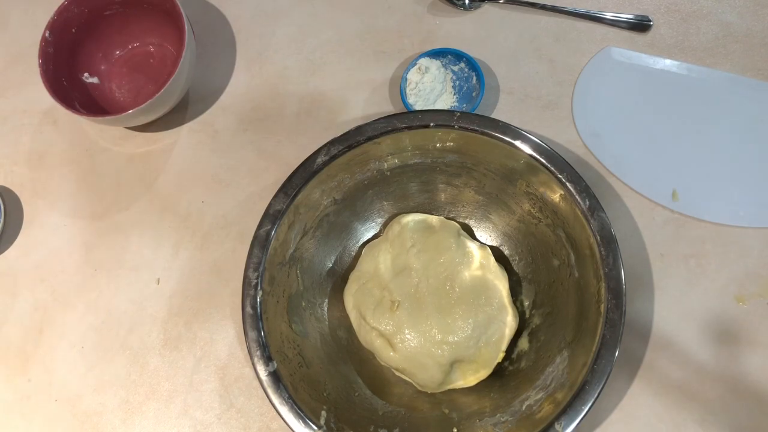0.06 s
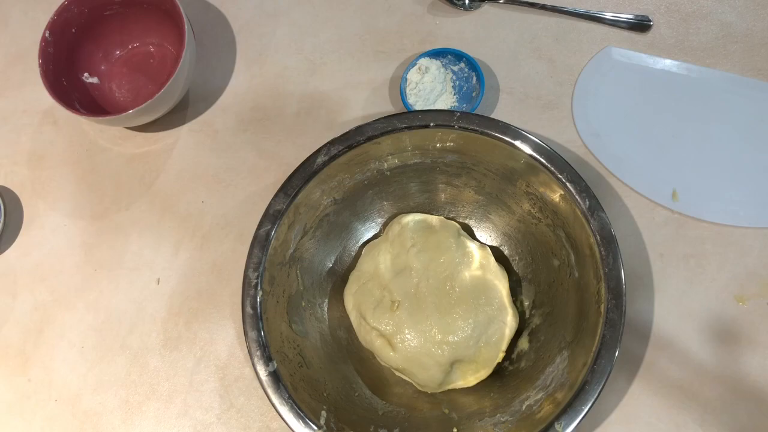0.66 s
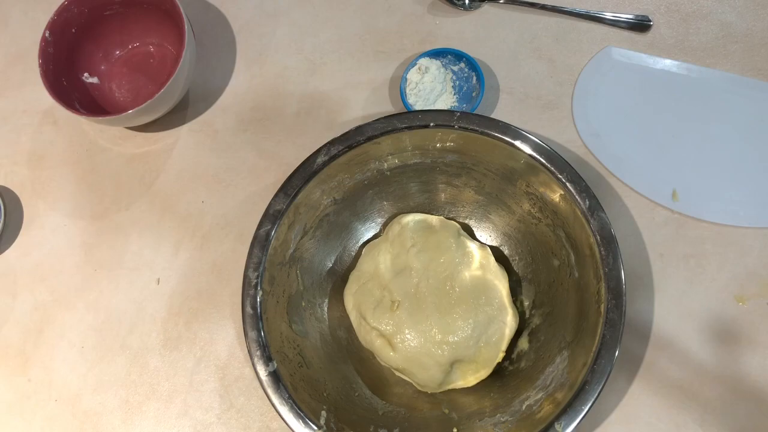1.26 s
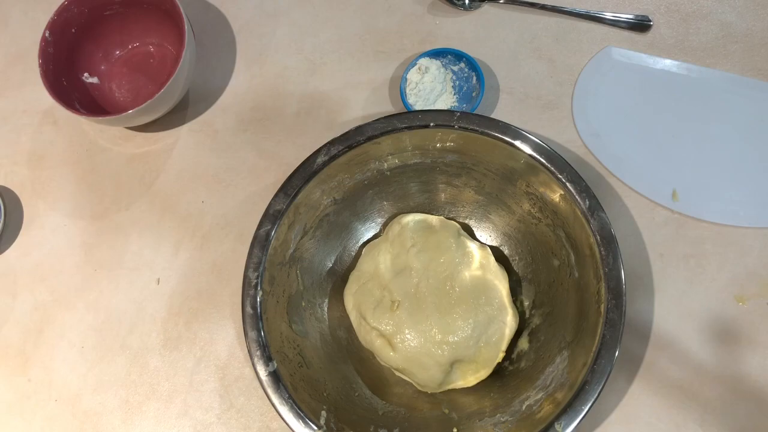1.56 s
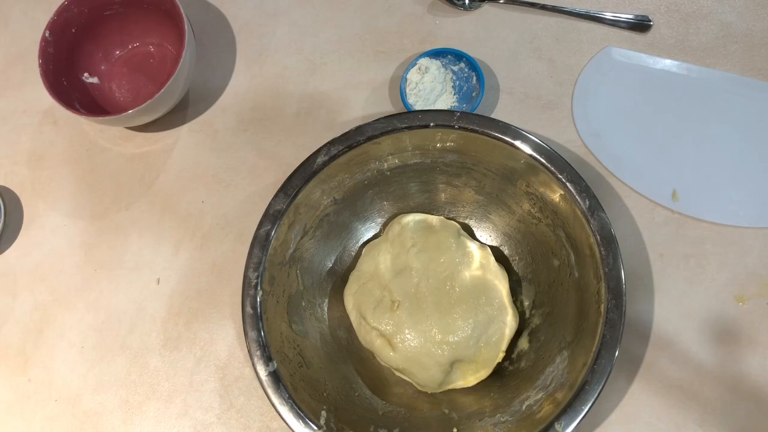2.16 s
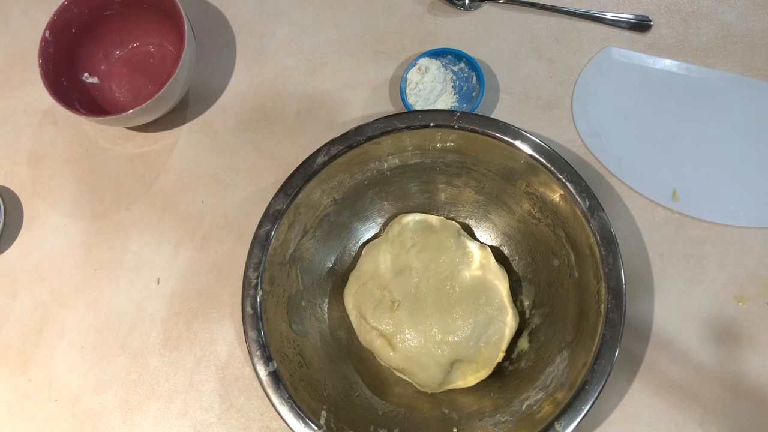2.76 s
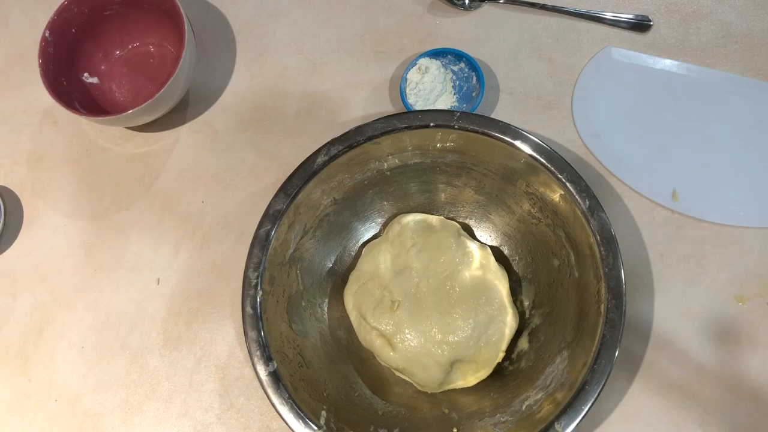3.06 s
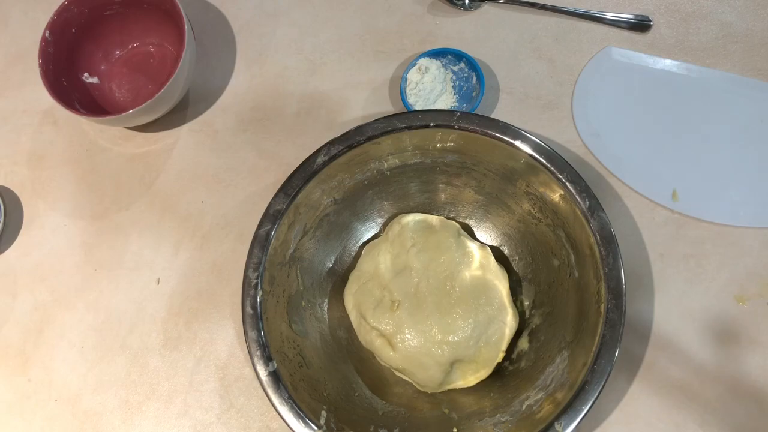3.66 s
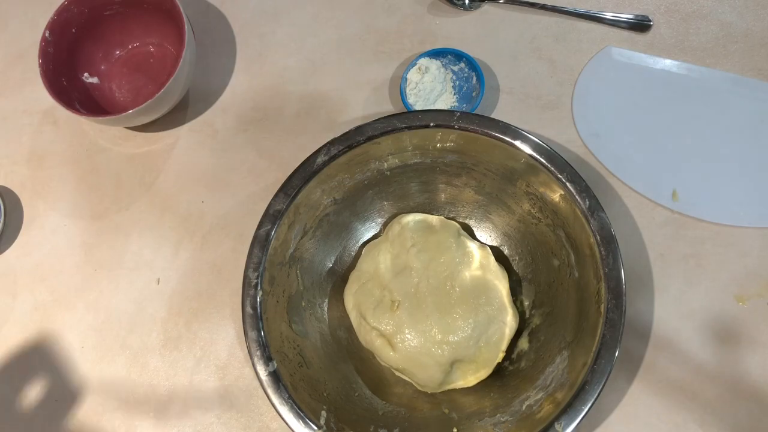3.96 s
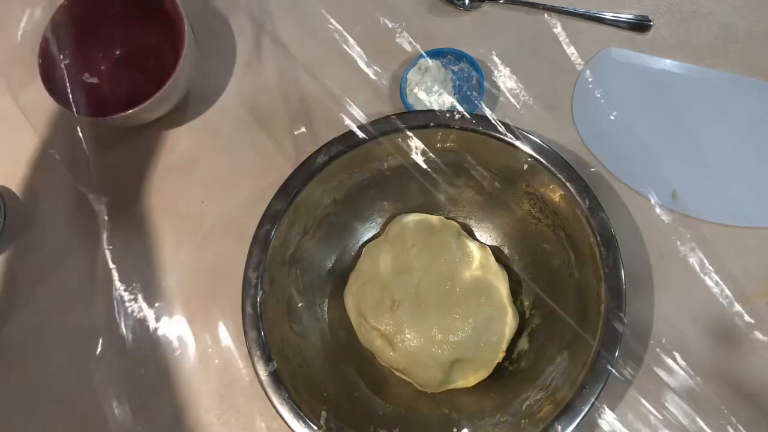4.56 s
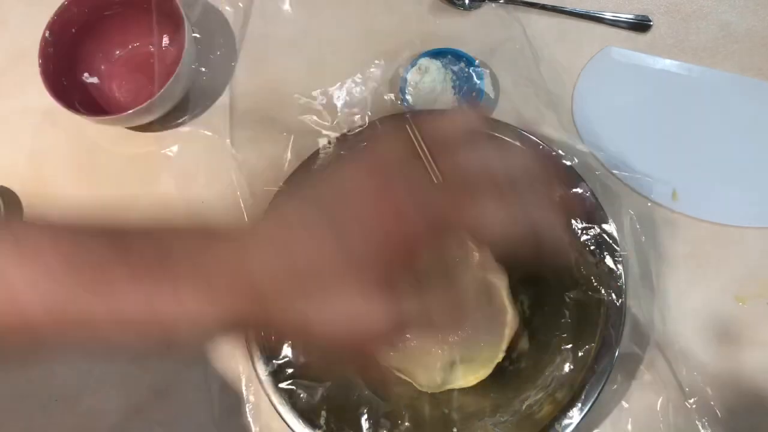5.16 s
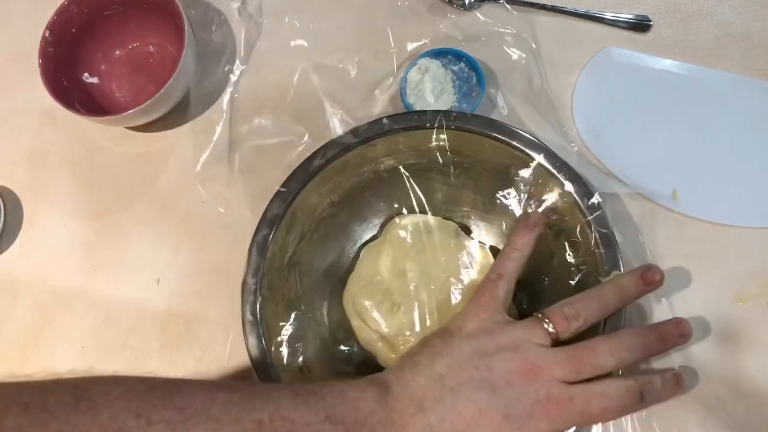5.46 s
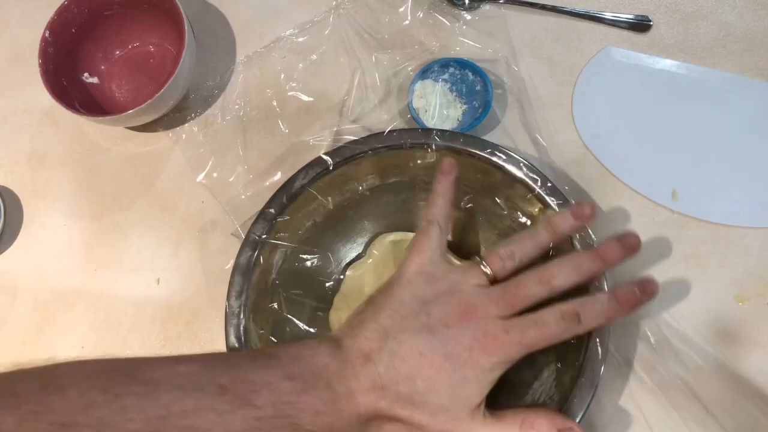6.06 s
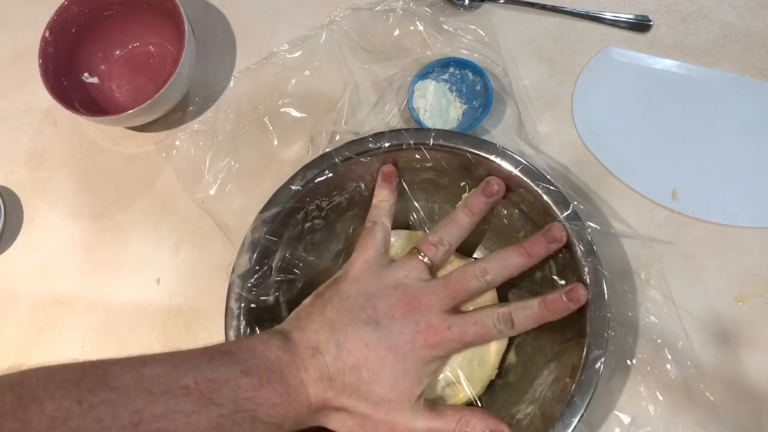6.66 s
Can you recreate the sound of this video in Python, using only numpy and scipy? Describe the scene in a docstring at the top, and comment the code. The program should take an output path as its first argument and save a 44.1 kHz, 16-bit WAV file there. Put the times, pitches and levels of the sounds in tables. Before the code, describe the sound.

Plastic wrap is tugged from a rattling box, rustles and crackles over a steel bowl, and is ripped off.

```python
"""Cling film over a bowl

In a small kitchen, film peels with stick-slip squeaks from a roll that scrapes and knocks in its box.
The sheet crinkles and snaps as its creases buckle, and a hand presses it onto a steel bowl, which
resonates under the friction. The stretched film rasps, then tears in a fast run of tiny ruptures.
The worktop thuds and rumbles, and a bird whistles faintly outside."""
import sys
import numpy as np
from scipy import signal
from scipy.fft import rfft, irfft
from scipy.io import wavfile
from scipy.ndimage import uniform_filter1d

SR = 44100
rng = np.random.default_rng(int(sys.argv[2]) if len(sys.argv) > 2 else 0)


def bounce(signal):
    """Save signal as a 16-bit WAV file at the path given by the first command-line argument."""
    frames = np.transpose(np.atleast_2d(signal))
    limited = np.clip(frames, -1, 1)
    pcm = np.round(limited * 32767).astype(np.int16)
    wavfile.write(sys.argv[1], SR, pcm)


N = 299880


# tugs on the film: t/s at full strength, hold/s, relative peeling level/dB, relative scraping level/dB
TUGS = [(0, .15, -59.5, -59), (.255, .02, -58, -54.5), (.39, .18, -62, -72), (.68, 0.028, -66, -78),
        (1.06, 0.056, -61.5, -69), (1.38, .025, -60, -80), (1.54, 0.1, -55, -71), (1.815, 0.092, -49, -52),
        (2.045, 0.033, -47, -45), (2.16, 0.044, -56.5, -59), (2.235, 0.058, -46.5, -45.5),
        (2.36, 0.024, -45.5, -44), (2.465, .03, -44, -47), (2.55, 0.21, -47, -44), (2.83, .36, -45, -39),
        (4.16, 0.043, -55.5, -55.5), (4.7, 0.036, -52, -54)]
def pulling():
    """Inertia: the roll coasts after each tug. Returns the envelopes of peeling and of scraping."""
    return [strokes(TUGS, attack=0.033, release=0.046, column=k, coast=0.18, sag_db_per_s=8)
            for k in range(2)]


# spectrum of the peeling: f/Hz, gain/dB
PEEL_SPECTRUM = [(150, 1), (600, -3.5), (1200, -1.5), (2300, 7), (3500, 2.5), (4800, 0), (7000, -3),
                 (10000, -4), (16000, -9)]
def peel(strength, gain_db=2.0, cling_db=1.0, cling_hz=40):
    """Adhesive failure: thousands of tiny bonds let go unevenly as the film leaves the roll."""
    ticks = facets(clicks(3500, spread_db=0.5), width_hz=4600)
    bonds = evened(ticks, window=0.074)
    cling = from_db(cling_db * wander(N, cling_hz))
    return from_db(gain_db) * strength * cling * rms_one(coloured(bonds, PEEL_SPECTRUM))


# movements of the loose sheet: t/s at full strength, hold/s, level/dB
CRUMPLING = [(1.53, .11, -61), (1.82, 0.069, -49.5), (3.1, 0.3, -53), (3.535, 0.13, -51), (3.71, .2, -55.5),
             (3.975, 0.2, -49), (4.27, 0.016, -50.5), (4.365, 0.32, -51.5), (4.6, 0.034, -65),
             (4.695, 0.031, -51), (4.82, 0.073, -60), (5.06, .02, -62), (5.16, 0.067, -57.5)]
# spectrum of the crinkling: f/Hz, gain/dB
CRINKLE_SPECTRUM = [(150, -44), (500, -1), (1200, -8), (2500, 0.5), (4500, 2), (7000, 0.5), (10000, -1),
                    (13000, -2.5), (16000, -6.5)]
def crinkle(pressed, slide_db=1.0, loose_per_s=420, pressed_per_s=1300):
    """Buckling: creases tick at random, faster under the hand, over the hiss of film sliding on film."""
    loose = strokes(CRUMPLING, attack=0.036, release=0.022)
    per_s = np.where(pressed > loose, pressed_per_s, loose_per_s)
    ticks = facets(clicks(per_s, spread_db=4.0), width_hz=2800)
    creases = evened(highpass(ticks, 4000), window=0.1)
    sheet = creases + from_db(slide_db) * rng.standard_normal(N)
    return np.hypot(loose, pressed) * rms_one(coloured(sheet, CRINKLE_SPECTRUM))


# single snaps of the film: t/s, peak level of the crack/dB, decay/s
FILM_SNAPS = [(1.626, -39, 0.0013), (1.846, -31, .0012), (2.223, -27, 0.0013), (2.265, -32, .0025),
              (2.355, -25, .0016), (2.586, -20.5, 0.0028), (2.817, -38, .0024), (2.83, -31, 0.0052),
              (2.85, -24, 0.0089), (3, -28, .002), (3.244, -31, .002), (3.35, -36, 0.0022),
              (3.992, -33, .0006), (4.0105, -31, 0.00026), (4.1657, -32, 0.00084), (4.3905, -25.5, 0.0016),
              (4.4203, -31, .0003), (4.446, -29.5, .0003), (4.4767, -31, 0.00022), (4.515, -21.5, 0.0011),
              (4.5298, -25, .0004), (4.891, -34, .0006), (5.4577, -27, .0003), (5.4685, -21, 0.0013),
              (5.634, -23, 0.0012), (5.6575, -30, 0.0023), (5.68, -23.5, 0.0003), (5.7778, -19.5, 0.0021),
              (5.904, -19.5, 0.0013), (5.9345, -20.5, 0.0015), (5.971, -20.5, 0.00072),
              (6.2417, -29, 0.0023), (6.462, -22.5, 0.0034), (6.494, 1, 0.0016), (6.5141, -3.5, 0.0021),
              (6.5218, -9, 0.0026), (6.6783, -15.5, 0.0049)]
# spectrum of a crack: f/Hz, gain/dB
CRACK_SPECTRUM = [(200, -2), (900, -4), (2500, 3), (5000, 8), (7500, 8.5), (11000, 8), (16000, -7)]
def snaps(flap_db=-14.0):
    """Snap-through: a big crease cracks; the longer the crack, the more of the sheet flaps after it."""
    out = np.zeros(N)
    typical_decay = np.median(np.array(FILM_SNAPS)[:, 2])
    for start, db, decay in FILM_SNAPS:
        crack = peak_one(coloured(burst(decay), CRACK_SPECTRUM))
        flap = peak_one(bandpass(burst(0.0049), 600, 2200))
        snap = crack + from_db(flap_db) * decay / typical_decay * flap
        add(out, start + 0.0007, from_db(db) * snap)
    return out


# envelope of the tear crossing the sheet: t/s, level/dB
TEAR_ENVELOPE = [(6.497, -37), (6.512, -21.5), (6.517, -22.5), (6.535, -25), (6.56, -23.5), (6.605, -27.5),
                 (6.63, -22.5), (6.678, -25), (6.686, -56)]
# spectrum of the tear: f/Hz, gain/dB
TEAR_SPECTRUM = [(59, -43), (100, -16), (135, 7), (373, 10.5), (583, 7), (752, -6), (1030, 6), (1280, -3),
                 (1450, 3), (2420, -6.5), (2750, -5.5), (9210, -1.5), (16000, -3.5)]
def tear():
    """Crack propagation: the rip is a very fast run of tiny ruptures."""
    ticks = facets(clicks(9000, spread_db=-2.0), width_hz=2900)
    ruptures = evened(ticks, window=0.033)
    return envelope(TEAR_ENVELOPE) * rms_one(coloured(ruptures, TEAR_SPECTRUM))


# runs of slips on the roll: t/s, duration/s, typical peak level/dB, f/Hz
SLIP_RUNS = [(2.236, .014, -30, 2203), (2.357, .03, -31, 2445), (2.46, .028, -31.5, 2280)]
def squeaks(gap_s=0.008, rise_s=0.002, pitch_scatter=0.045, scatter_db=3.0, octave_db=-9.0):
    """Stick-slip: each slip sets the taut strip of film ringing for a few milliseconds."""
    out, t = np.zeros(N), seconds(0.019)
    pulse = t / rise_s * np.exp(1 - t / rise_s)
    for start, length, db, hz in SLIP_RUNS:
        for slip in np.arange(start, start + length, gap_s):
            detune, force = rng.standard_normal(2)
            roughness = 0.57 * wander(len(t), 330)
            phase = 2 * np.pi * hz * (1 + pitch_scatter * detune) * t + roughness
            tone = np.sin(phase) + from_db(octave_db) * np.sin(2 * phase)
            add(out, slip, from_db(db + scatter_db * force) * pulse * tone)
    return out


# resonances of the cardboard box: f/Hz, bandwidth/Hz, gain/dB
BOX_RESONANCES = [(213, 89, -1.5), (384, 132, 0.5), (871, 55, 3), (1155, 200, -1.5), (1685, 270, -1),
                  (2200, 370, -14), (2780, 650, -13), (3660, 590, -17)]
def roll(strength):
    """Frictional excitation: the cardboard core judders round and drives the resonances of the box."""
    friction = evened(clicks(2500, spread_db=3.5), window=0.029)
    return strength * rms_one(resonate(friction, BOX_RESONANCES))


# knocks of the roll: t/s, peak level/dB, lower f/Hz, upper f/Hz, rattle decay/s
ROLL_KNOCKS = [(.25, -31.5, 250, 2560, 0.025), (.262, -32.5, 250, 1650, 0.025),
               (0.31, -39.5, 250, 1200, 0.008), (0.552, -45, 200, 1800, 0.028),
               (1.265, -50, 300, 1420, 0.0043), (2.815, -27, 900, 6000, 0.0044),
               (2.848, -34, 500, 2500, 0.016), (3.0003, -27.5, 900, 5000, 0.0024),
               (3.835, -26.5, 327, 3470, 0.016), (3.8393, -26, 790, 6050, 0.008),
               (4.783, -27.5, 560, 4500, 0.0048), (4.914, -46, 900, 2950, 0.0037)]
# resonances of the struck box wall: f/Hz, bandwidth/Hz, gain/dB
WALL_RESONANCES = [(378, 99, 4), (900, 96, 3.5), (1030, 240, 3.5), (1375, 280, -0.5), (1650, 410, -4.5),
                   (2110, 170, -2.5), (2500, 400, -6), (4080, 760, -4), (5670, 19000, -12)]
def knocks(rattle_db=-16.5):
    """Impact excitation: the roll strikes the box wall once and rattles to rest."""
    out = np.zeros(N)
    for start, db, low_hz, high_hz, decay in ROLL_KNOCKS:
        contact = from_db(rattle_db) * burst(decay)
        contact[0] += 1   # the hard first contact
        hit = resonate(bandpass(contact, low_hz, high_hz), WALL_RESONANCES)
        add(out, start, from_db(db) * peak_one(hit))
    return out


# presses on the bowl: t/s at full strength, hold/s, crinkling level/dB, rubbing level/dB
HAND_PRESSES = [(5.338, 0.024, -51.5, -47), (5.43, 0.028, -44.5, -47), (5.465, 0.0088, -41.5, -40),
                (5.57, .31, -51.5, -52.5), (5.63, 0.035, -49.5, -48.5), (5.905, 0.066, -40.5, -53.5),
                (6.0, 0.02, -49, -48), (6.12, 0.18, -51.5, -57.5), (6.248, 0.031, -39.5, -43),
                (6.34, .145, -47.5, -47)]
def pressing():
    """Contact force: the hand smooths the film. Returns the envelopes of crinkling and of rubbing."""
    return [strokes(HAND_PRESSES, attack=0.015, release=0.043, column=k) for k in range(2)]


# resonances of the covered bowl: f/Hz, bandwidth/Hz, gain/dB
BOWL_RESONANCES = [(196, 180, -1), (430, 117, 2.5), (597, 200, -1), (880, 140, 3), (1037, 103, 5.5),
                   (1300, 410, 0), (1730, 310, -0.5), (2680, 2000, -7)]
def rub(strength):
    """Forced vibration: palm and film catch on the rim and drive the covered bowl."""
    friction = evened(clicks(1500, spread_db=3.0), window=0.09)
    return strength * rms_one(resonate(friction, BOWL_RESONANCES))


# rasps of the film: t/s, duration/s, initial f/Hz, final f/Hz, peak level/dB
FILM_RASPS = [(1.52, 0.13, 2600, 2200, -54), (1.78, 0.078, 1750, 1524, -47.5),
              (1.86, 0.079, 2200, 1996, -47), (5.62, 0.058, 415, 384, -47.5),
              (5.72, 0.178, 1080, 980, -51.5), (6.41, 0.084, 255, 351, -36.5), (6.64, 0.039, 561, 570, -32)]
def rasps():
    """Friction-induced oscillation: taut film dragged over an edge gives a rough, gliding tone."""
    return glides(FILM_RASPS, waver=0.102)


# blows on the worktop: t/s, peak level/dB, contact time/s
WORKTOP_BLOWS = [(1.21, -52, 0.0098), (1.265, -41, 0.0086), (5.344, -28.5, 0.0081), (5.68, -38.5, 0.0045),
                 (6.27, -22.5, 0.00046), (6.518, -26.5, 0.0015)]
# modes of the worktop: f/Hz, relative level/dB, T60/s
WORKTOP_MODES = [(80.4, -6, 0.64), (153.3, -8, 0.42), (192, 3.5, 0.1), (255, -3, 0.18), (314, 2.5, 0.077)]
def bumps():
    """Modal decay: the worktop rings after a blow; a longer contact favours the lowest mode."""
    out, t = np.zeros(N), seconds(0.6)
    ring = sum(from_db(db - 60 * t / t60) * np.sin(2 * np.pi * hz * t) for hz, db, t60 in WORKTOP_MODES)
    for start, db, contact in WORKTOP_BLOWS:
        thud = lowpass(ring, 0.5 / contact)
        add(out, start, from_db(db) * peak_one(thud))
    return out


# arms leaning on the worktop: t/s at full strength, hold/s, level/dB
LEANING = [(4.15, 0.61, -59.5)]
def rumble(scraping, rubbing, roll_db=-11.5, hand_db=-12):
    """Structure-borne sound: the worktop carries dull noise from the roll, the hand and the arms."""
    arms = strokes(LEANING, attack=0.079, release=0.5)
    strength = from_db(roll_db) * scraping + from_db(hand_db) * rubbing + arms
    return strength * rms_one(bandpass(rng.standard_normal(N), 80, 190))


# whistles, mostly falling: t/s, duration/s, initial f/Hz, final f/Hz, relative level/dB
WHISTLES = [(.32, 0.22, 2866, 2490, -64), (.67, .1, 2550, 2470, -71), (.9, .1, 3010, 3250, -62),
            (1.0, 0.18, 2750, 2790, -65.5), (1.31, 0.18, 2830, 2600, -62), (2.16, 0.084, 3085, 2950, -51),
            (3.57, 0.13, 2560, 2300, -64.5), (3.71, 0.085, 2940, 2900, -65), (4.29, 0.15, 2740, 2380, -59),
            (4.44, 0.207, 2470, 2425, -67), (4.88, 0.11, 2540, 2420, -70), (5.1, 0.18, 2647, 2330, -60)]
def bird(gain_db=3.5):
    """Multipath propagation: far-off whistles are smeared by reflections from the walls outside."""
    song = glides(WHISTLES, waver=0.018)
    return from_db(gain_db) * (song + 0.7 * echoes(song, t60=0.8))


# spectrum of the kitchen's background: f/Hz, gain/dB
ROOM_TONE = [(20, -58), (45, -1), (76, 0), (149, 0), (263, -8), (354, -7), (659, -13.5), (1230, -11.5),
             (3500, -15), (7000, -22), (16000, -27.5)]
def room_tone(level_db=-58):
    """Ambient noise: a steady floor, strongest in the bass."""
    return from_db(level_db) * rms_one(coloured(rng.standard_normal(N), ROOM_TONE))


def reflected(x, delay_s=0.001316, echo_db=-22.5):
    """Comb filtering: the worktop returns a slightly delayed copy that interferes with the sound."""
    out = x.copy()
    add(out, delay_s, from_db(echo_db) * x)
    return out / np.sqrt(1 + from_db(echo_db) ** 2)


def echoes(x, t60, crossover_hz=4500, treble_share=0.57, first_echo_s=0.0096):
    """Reverberation: diffuse reflections decay exponentially, the treble sooner."""
    t = seconds(t60)
    noise = rng.standard_normal(len(t))
    low = lowpass(noise, crossover_hz) * from_db(-60 * t / t60)
    high = highpass(noise, crossover_hz) * from_db(-60 * t / (t60 * treble_share))
    tail = (low - from_db(-2.5) * high) * (t > first_echo_s)
    return signal.fftconvolve(x, tail / np.sqrt(np.sum(tail ** 2)))[:N]


def facets(train, width_hz, count=14):
    """Damped resonance: each click flips one facet of film, which rings briefly at its own pitch."""
    struck = rng.integers(0, count, N)
    pitches = np.linspace(1200, 15500, count)
    return sum(resonate(train * (struck == k), [(hz, width_hz, 0)]) for k, hz in enumerate(pitches))


def glides(rows, waver, waver_hz=200):
    """Frequency modulation: swelling tones slide unsteadily from one pitch to another."""
    out = np.zeros(N)
    for start, length, start_hz, end_hz, db in rows:
        progress = seconds(length) / length
        hz = start_hz + (end_hz - start_hz) * progress
        hz *= 1 + waver * wander(len(hz), waver_hz)
        tone = np.sin(2 * np.pi * np.cumsum(hz) / SR)
        add(out, start, from_db(db) * np.sin(np.pi * progress) * tone)
    return out


def strokes(rows, attack, release, column=0, coast=0, sag_db_per_s=0):
    """Incoherent addition: movements that swell, hold and fade sum in power to one envelope."""
    t, power = np.arange(N) / SR, 0
    for start, hold, *levels_db in rows:
        swell = np.exp(-np.clip((start - t) / attack, 0, 20))
        held = from_db(levels_db[column] - sag_db_per_s * np.clip(t - start, 0, hold))
        fade = np.exp(-np.clip((t - start - hold) / (release + coast * hold), 0, 20))
        power = power + (swell * held * fade) ** 2
    return np.sqrt(power)


def envelope(rows):
    """Gain interpolated from rows of t/s, level/dB, fading quickly beyond the ends."""
    times, db = np.transpose(rows)
    t = np.arange(N) / SR
    outside = np.abs(t - np.clip(t, times.min(), times.max()))
    return from_db(np.interp(t, times, db)) * np.exp(-outside / 0.0093)


def clicks(per_s, spread_db):
    """Poisson process: impulses of random time, size and sign."""
    sizes = from_db(spread_db * np.minimum(rng.exponential(1, N), 4))
    signs = rng.choice([-1, 1], N)
    return sizes * signs * (rng.random(N) < per_s / SR)


def burst(decay):
    """Exponentially decaying noise."""
    t = seconds(0.2)
    return rng.standard_normal(len(t)) * np.exp(-t / decay)


def wander(samples, hz):
    """Low-passed random fluctuation of unit power."""
    return rms_one(lowpass(rng.standard_normal(samples), hz))


def evened(x, window):
    """Compression: power is held near one over each window, and the grain is kept."""
    power = uniform_filter1d(x ** 2, max(int(window * SR), 2))
    return x / np.sqrt(np.abs(power) + 0.03 * np.mean(x ** 2))


def resonate(x, resonances):
    """Modal superposition: parallel two-pole resonators, alternating in sign."""
    out = 0
    for k, (hz, width, db) in enumerate(resonances):
        radius = np.exp(-np.pi * width / SR)
        poles = [1, -2 * radius * np.cos(2 * np.pi * hz / SR), radius ** 2]
        gain = (-1) ** k * from_db(db) * (1 - radius ** 2) / 2
        out = out + gain * signal.lfilter([1, 0, -1], poles, x + 1e-18)
    return out


def coloured(x, spectrum, size=4096):
    """Minimum-phase filter with the given spectrum."""
    hz, db = np.transpose(spectrum)
    bins = np.maximum(np.arange(size // 2 + 1) * SR / size, 1)
    gain = from_db(np.interp(np.log(bins), np.log(hz), db))
    cepstrum = irfft(np.log(gain))
    cepstrum[1:size // 2] *= 2   # folding the cepstrum makes the response causal
    cepstrum[size // 2 + 1:] = 0
    response = irfft(np.exp(rfft(cepstrum)))
    return signal.fftconvolve(x, response)[:len(x)]


def lowpass(x, hz):
    """Second-order low-pass."""
    return signal.sosfilt(signal.butter(2, hz, fs=SR, output="sos"), x + 1e-18)


def highpass(x, hz):
    """Second-order high-pass."""
    return signal.sosfilt(signal.butter(2, hz, "high", fs=SR, output="sos"), x + 1e-18)


def bandpass(x, low_hz, high_hz):
    """Low-pass and high-pass in cascade."""
    return highpass(lowpass(x, high_hz), low_hz)


def from_db(db):
    """Decibels to gain."""
    return 10 ** (np.asarray(db) / 20)


def rms_one(x):
    """Scale to unit power."""
    return x / np.sqrt(np.mean(x ** 2) + 1e-20)


def peak_one(x):
    """Scale to unit peak."""
    return x / np.abs(x).max()


def seconds(length):
    """A time axis of the given length."""
    return np.arange(int(length * SR)) / SR


def add(out, start, sound):
    """Superpose a sound from a start time in seconds."""
    at = max(int(start * SR), 0)
    out[at:at + len(sound)] += sound[:max(N - at, 0)]


def scene():
    """Direct-to-reverberant ratio: film and bowl sound close by, the box a little further off."""
    peeling, scraping = pulling()
    pressed, rubbing = pressing()
    film = reflected(peel(peeling) + crinkle(pressed) + tear()) + snaps()
    near = film + rub(rubbing) + rasps()
    box, slips, hits = roll(scraping), squeaks(), knocks()
    direct = near + from_db(-2.0) * box + slips + hits
    to_walls = from_db(-13.5) * near + from_db(-9.5) * box + from_db(-10.0) * slips + from_db(-8.5) * hits
    kitchen = echoes(to_walls, t60=0.54) + room_tone()
    return (direct + kitchen + bird() + bumps() + rumble(scraping, rubbing))[None]


def record(dry, cutoff_hz=16000):
    """Band limiting: the microphone loses the deep bass, and the top is cut steeply."""
    thin = highpass(highpass(dry, 50), 46)
    return signal.sosfilt(signal.ellip(12, 0.2, 80, cutoff_hz, fs=SR, output="sos"), thin)


dry = scene()
out = record(dry)
bounce(out)
```